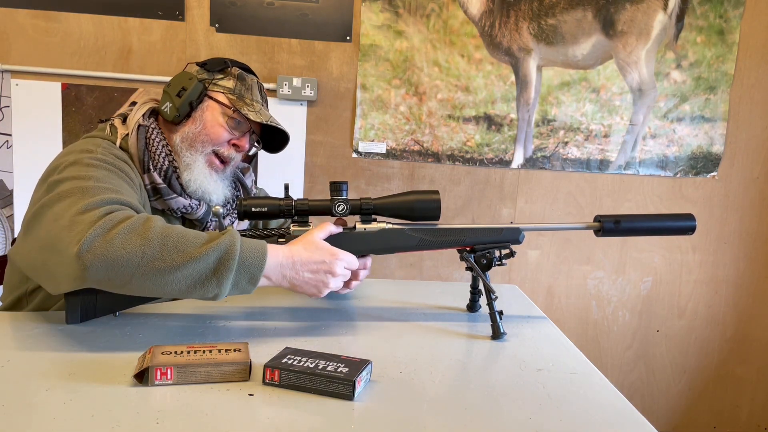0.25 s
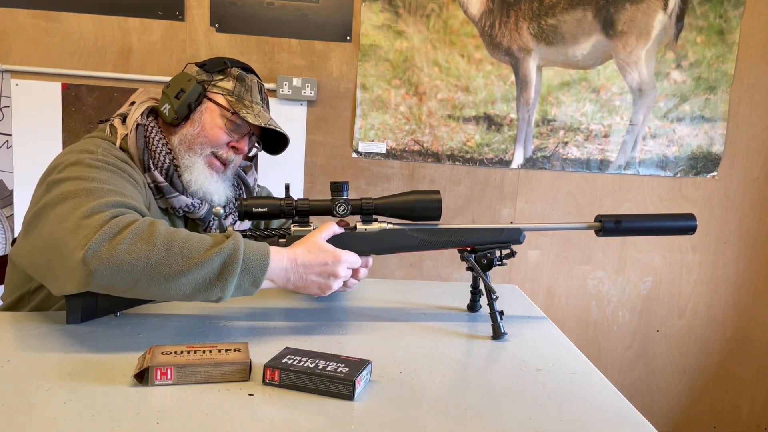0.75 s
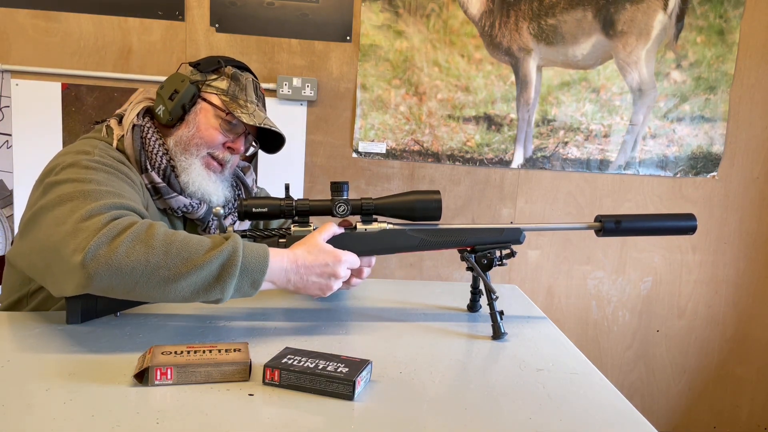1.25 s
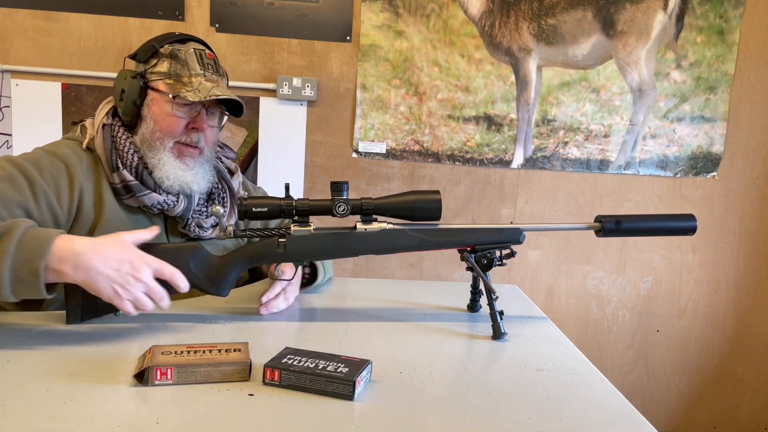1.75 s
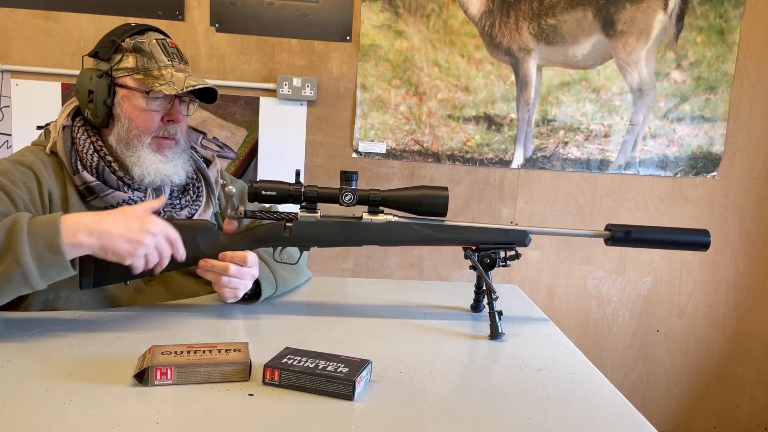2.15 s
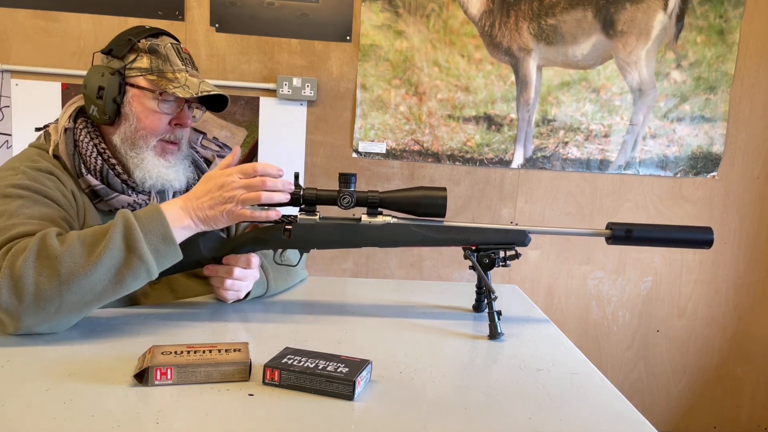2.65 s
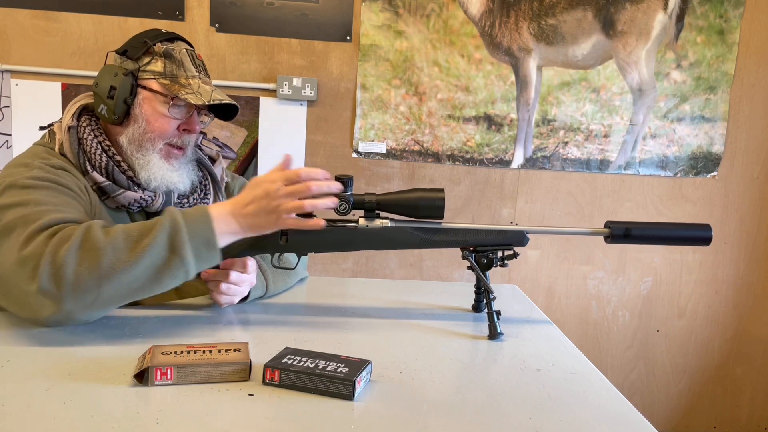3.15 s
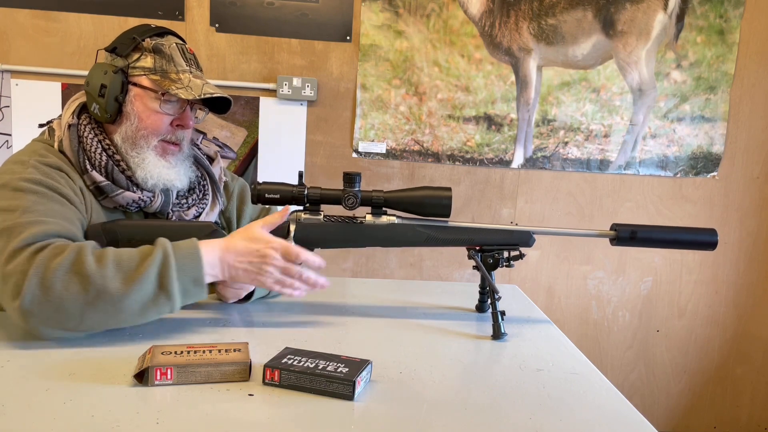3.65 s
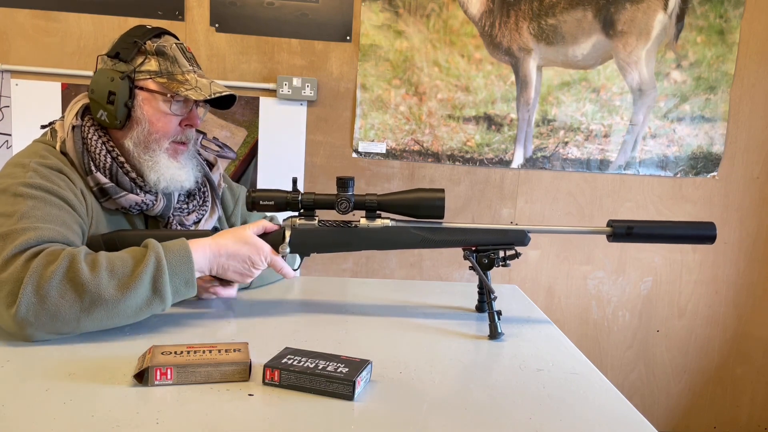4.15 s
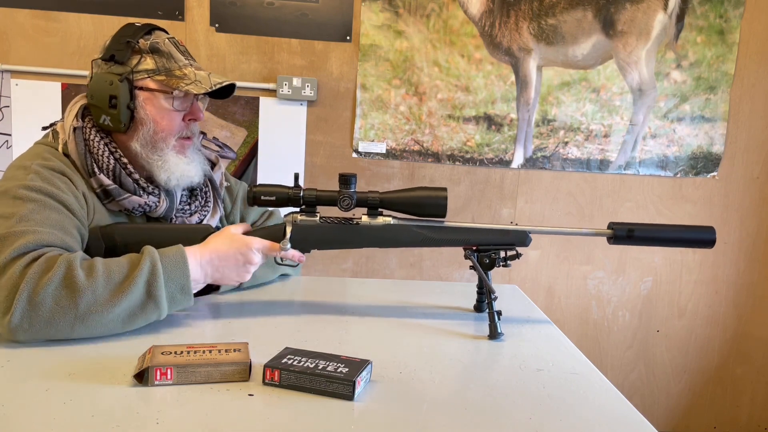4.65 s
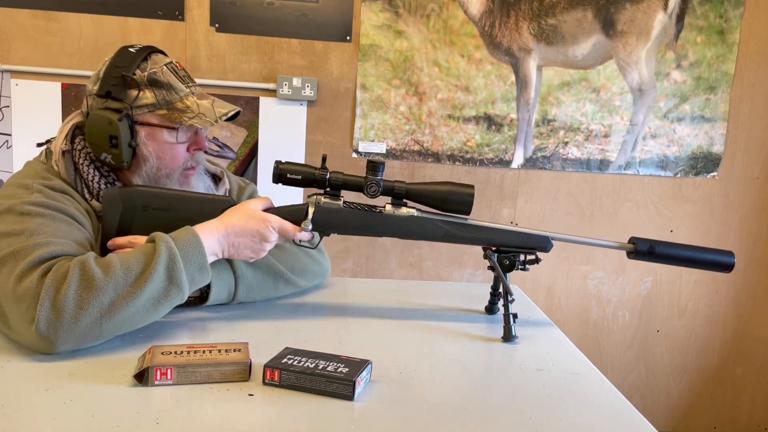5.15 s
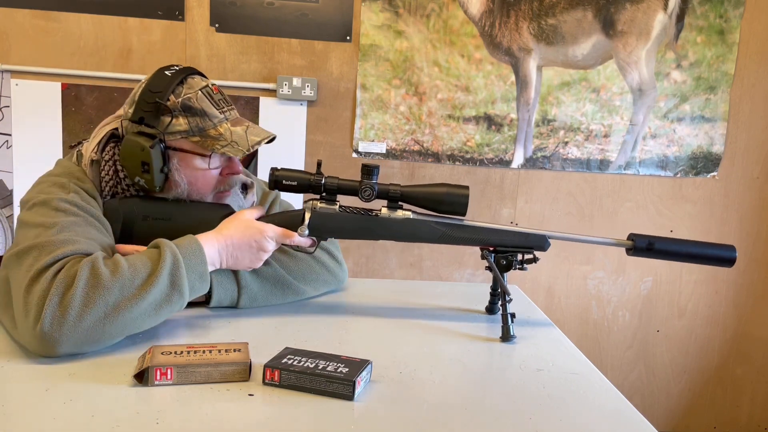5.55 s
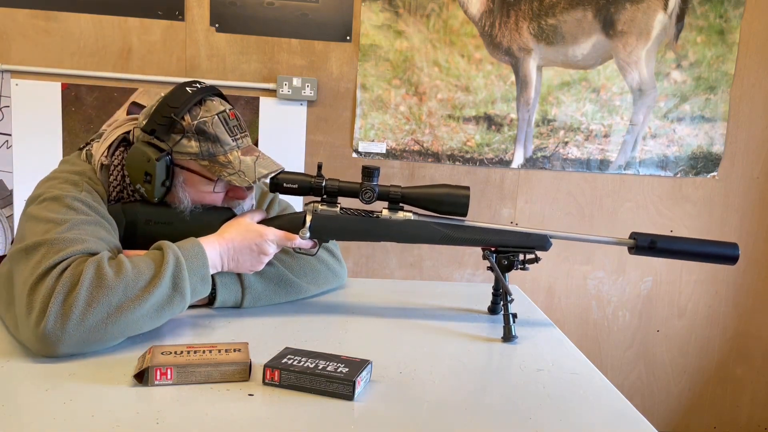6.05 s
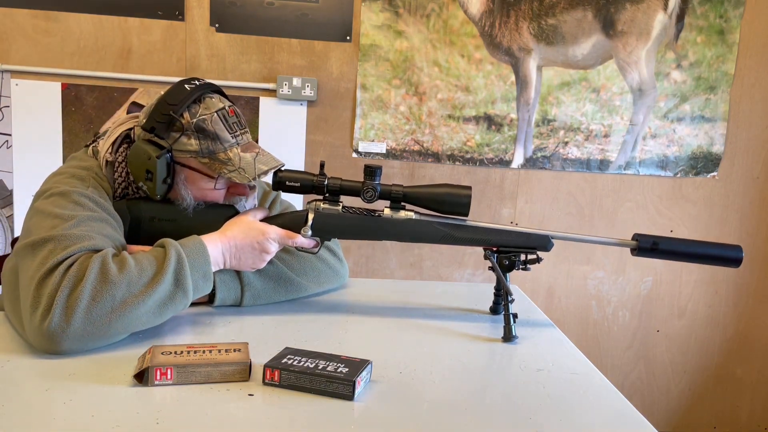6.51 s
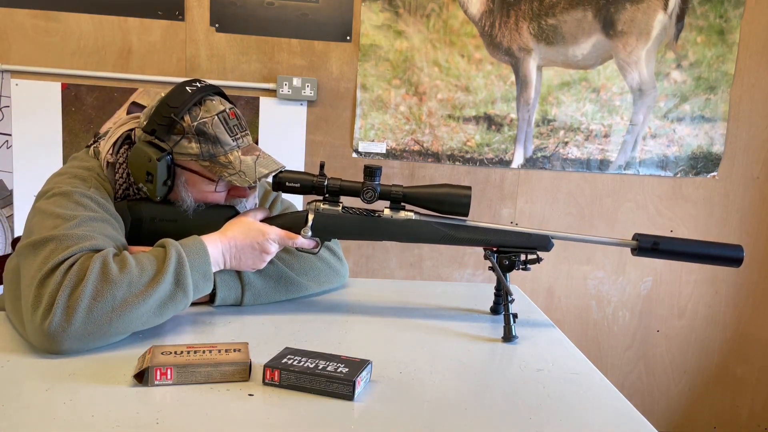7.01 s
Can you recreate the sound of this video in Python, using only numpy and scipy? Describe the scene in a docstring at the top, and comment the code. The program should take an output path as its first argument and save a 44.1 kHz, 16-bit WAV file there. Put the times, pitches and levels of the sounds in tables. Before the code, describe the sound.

A magazine snaps into a rifle in a small hard room, then the bolt clacks back and forward with loud steel rings, followed by soft knocks and bipod scuffs.

```python
"""Faint ventilation fills a small, hard-walled range, then the magazine of a bolt-action rifle snaps home.
Hands knock the stock on its bench; the bolt is lifted, drawn back, run forward and locked with steel clacks.
The bipod skids, its springs creak, the barrel hums and a sleeve rustles as the rifle is shouldered.
Blows are noise bursts and dying tones, rubbing is uneven noise, and echoes and a tail make the room.
The loudest clacks overload the microphone."""
import sys
import numpy as np
from scipy import signal
from scipy.fft import rfft, irfft, next_fast_len
from scipy.io import wavfile
from scipy.ndimage import uniform_filter1d, minimum_filter1d, map_coordinates

SR = 44100
rng = np.random.default_rng(int(sys.argv[2]) if len(sys.argv) > 2 else 0)


def store_wav(level_fs):
    """Save 16-bit WAV to argv[1]."""
    pcm = np.round(np.clip(np.atleast_2d(level_fs), -1, 1) * 32767)
    wavfile.write(sys.argv[1], SR, pcm.T.astype(np.int16))


N = 320871

# Tones of the ringing steel action. Each row: pitch in Hz, relative level in dB, time to die by 60 dB in seconds.
STEEL_MODES = [(1292, -4, .12), (2393, -2, .16), (2964, -3, .14), (4067, -6, .15), (4119, 2, .4),
               (4175, 1, .3), (4667, 0, .05), (4841, -1, .1), (4960, -3, .1), (5430, -1, .05),
               (6183, -6, .12), (6952, -6, .12), (9066, -3, .07), (9177, -5, .07)]
# Colour of the bright edge of a blow. Each row: frequency in Hz, relative spectrum level in dB.
EDGE_COLOUR = [(4000, -30), (7300, -5.5), (9000, 1), (10000, -9.5), (12000, -24)]
# Colour of the highest fizz of a blow. Each row: frequency in Hz, relative spectrum level in dB.
FIZZ_COLOUR = [(8000, -45.5), (10500, -3.5), (13000, 2.5), (16000, -10), (20000, -25)]


def amp(db):
    """Turn decibels into a gain."""
    return 10 ** (np.asarray(db) / 20)


def unit(x):
    """Scale to an average (rms) level of 1."""
    return x / np.sqrt(np.mean(x ** 2) + 1e-20)


def clock(size):
    """Give the time in seconds of each sample."""
    return np.arange(size) / SR


def along(points, hz):
    """Read values between (Hz, value) points, with frequency on a log axis."""
    point_hz, values = np.transpose(points)
    return np.interp(np.log(hz + 1), np.log(point_hz + 1), values)


def curves(rows):
    """Draw each column after the time as a line with one value per sample."""
    seconds, *columns = np.transpose(rows)
    return [np.interp(clock(N), seconds, column) for column in columns]


def coloured(x, spectrum):
    """Make some frequencies of x louder than others, as the spectrum says, at rms 1."""
    m = next_fast_len(len(x))
    gain = amp(along(spectrum, np.fft.rfftfreq(m, 1 / SR)))
    return unit(irfft(rfft(x, m) * gain, m)[:len(x)])


def fade(t60, size):
    """Die away by 60 dB in t60 seconds."""
    return np.exp(-np.log(1000) * clock(size) / max(t60, 1e-3))


def burst(spectrum, t60, size=16384):
    """A blow into many close, damped modes: a dying, evenly spread rattle with a colour."""
    rattle = rng.standard_normal(size) * fade(t60, size)
    # keep only the phases, so that no one mode stands out
    even = irfft(np.exp(1j * np.angle(rfft(rattle)))) * fade(5 * t60, size)
    even *= np.linalg.norm(fade(t60, size)) / np.linalg.norm(even)
    gain = amp(along(spectrum, np.fft.rfftfreq(size, 1 / SR)))
    # fold the log spectrum onto positive time: the colour cannot sound before the blow
    causal = irfft(np.log(unit(gain) + 1e-6)) * (1 + np.sign(np.fft.fftfreq(size)))
    return irfft(np.exp(rfft(causal)) * rfft(even))


def ring(modes, size=SR):
    """Clear tones struck together, each dying at its own pace, with alternating signs."""
    total = np.zeros(size)
    for k, (hz, db, t60) in enumerate(modes):
        tone = np.sin(2 * np.pi * hz * clock(size))
        total += amp(db) * fade(t60, size) * tone * (-1) ** k
    return total


def add(track, s, sound):
    """Mix a sound into the track at s seconds."""
    part = track[round(s * SR):][:len(sound)]
    part += sound[:len(part)]


def wobble(rate):
    """A smooth random curve through rate random points a second."""
    return map_coordinates(rng.standard_normal(N // 8), [clock(N) * rate], mode="wrap")


def friction(spectrum, rate, grip_db):
    """Rubbing surfaces: coloured noise whose strength wanders at rate points a second."""
    return coloured(rng.standard_normal(N) * amp(grip_db * wobble(rate)), spectrum)


def strokes(rows, release):
    """Gain of movements: each swells by 60 dB in its rise time, holds, and dies by 60 dB in release seconds."""
    t, gain = clock(N), np.zeros(N)
    for s, held, rise, db in rows:
        before = np.maximum(s - t, 0) / max(rise, 1e-3)
        after = np.maximum(t - s - held, 0) / release
        gain = np.maximum(gain, amp(db) * np.exp(-np.log(1000) * (before + after)))
    return gain


def ventilation():
    """Steady air noise, and a fan motor's hum that wanders slightly in level and phase."""
    # Colour of the air noise. Each row: frequency in Hz, relative spectrum level in dB.
    air_colour = [(12, -41.5), (20, -9), (65, -8), (98, -5.5), (204, -13), (228, -13.5), (301, -17.5),
                  (377, -19), (607, -20.5), (738, -20), (1060, -15.5), (2910, -28), (4060, -36.5),
                  (12100, -38), (16000, -46.5)]
    # Fan motor tones. Each row: pitch in Hz, middle level in dB.
    hum_tones = [(100, -59.5), (300, -72)]
    air_db = -53.5
    out = amp(air_db) * coloured(rng.standard_normal(N), air_colour)
    for hz, db in hum_tones:
        out += amp(db + 2 * wobble(4)) * np.sin(2 * np.pi * hz * clock(N) + wobble(12))
    return out


def sleeve():
    """Fleece rubs on itself as the arm moves, heard as soft uneven noise."""
    # Arm movements. Each row: full speed in seconds, time held in seconds, rise in seconds, level in dB.
    arm_moves = [(1.4, 0.016, 0.32, -55.5), (1.95, 0.22, 1, -52), (4.08, 0.39, 2.8, -55.5),
                 (5.04, 0.18, 1.5, -56), (5.4, 0.66, 0.91, -65)]
    # Colour of the cloth. Each row: frequency in Hz, relative spectrum level in dB.
    cloth_colour = [(1180, -29.5), (2000, -1), (2380, -6), (6940, -3), (9010, -3.5), (10400, -12),
                    (13800, -6.5), (16000, -19)]
    return strokes(arm_moves, release=1.2) * friction(cloth_colour, rate=110, grip_db=1.5)


def barrel():
    """The free barrel swells into a hum after each blow, then its tones die away."""
    # Blows. Each row: start in seconds, level in dB, swell in seconds, level of the upper tones in dB.
    barrel_blows = [(2.349, -33.5, 1, -12), (3.189, -43.5, 0.048, -5.5), (3.385, -36, 0.0403, 3.5),
                    (4.845, -26, 0.053, -1)]
    # Barrel tones. Each row: pitch in Hz, relative level in dB, time to die by 60 dB in seconds.
    barrel_modes = [(228.4, 5, 0.72), (483, -11, 0.91), (756, -17.5, 0.98), (970, -11, 0.84),
                    (1035, -12, 0.74), (1800, -24, .35), (2040, -19, .35), (2350, -16.5, .36)]
    out = np.zeros(N)
    for s, db, swell, upper_db in barrel_blows:
        hum = ring(barrel_modes[:1]) + amp(upper_db) * ring(barrel_modes[1:])
        add(out, s, amp(db) * hum * (1 - fade(swell, SR)))
    return out


def springs():
    """The bipod's coils slip at an uneven rate under load; each slip is a very high tick."""
    # Creaks. Each row: full load in seconds, time held in seconds, rise in seconds, relative level in dB.
    creaks = [(3.43, 0.017, 0.022, -23), (4.72, 0.069, 0.025, -51), (4.79, 0.05, 0.13, -34)]
    # Coil tones. Each row: pitch in Hz, relative level in dB, time to die by 60 dB in seconds.
    coil_modes = [(3210, -13.5, 0.065), (6250, -17.5, 0.041), (9400, -12, 0.023), (11600, -2, 0.011),
                  (12500, -7, .004), (13700, -2.5, .004)]
    turns = np.cumsum(170 * np.exp(0.36 * wobble(110))) / SR  # about 170 slips a second
    # one click at each whole turn, each with its own strength
    slips = np.diff(np.floor(turns), prepend=0) * amp(2.8 * wobble(200))
    ticks = unit(signal.fftconvolve(slips, ring(coil_modes))[:N])
    return amp(0.5) * strokes(creaks, release=0.033) * ticks


def bipod():
    """The feet skid on the bench as rough noise; the legs grind and jolt in their hinges."""
    # Skids of the feet. Each row: full speed in seconds, time held in seconds, rise in seconds, level in dB.
    skids = [(4.785, 0.03, 0.077, -28), (5.805, 0.007, 0.3, -44.5)]
    # Hinge grinding before a jolt. Each row: full speed in seconds, time held in seconds, rise in seconds,
    # level in dB.
    grinds = [(6.035, 0.03, 0.17, -36)]
    # Jolts of the legs. Each row: start in seconds, relative level in dB, time to die by 60 dB in seconds.
    jolts = [(5.498, -13, 0.039), (5.506, -5.5, 0.06), (5.792, -19.5, 0.06), (5.859, -26, 0.056),
             (6.044, -29, 0.26), (6.059, -13, 0.063)]
    # Colours of feet, hinges and legs. Each row: frequency in Hz, relative spectrum level in dB.
    feet_colour = [(59, -23), (100, -4), (234, 1), (381, -3.5), (535, 0), (818, -14.5), (1080, 2),
                   (1200, -21), (1950, -10), (2080, -9), (2630, -15.5), (5900, -19.5), (7450, -23.5),
                   (12100, -20.5), (16000, -33.5)]
    hinge_colour = [(180, -43), (300, -4.5), (593, -11), (745, -1.5), (1140, -14), (1580, -5), (1970, -11),
                    (2840, -15), (3350, -9), (5700, -24), (6740, -33), (8360, -28), (16000, -49)]
    legs_colour = [(300, -19), (550, -13), (800, -10), (1150, 0.5), (1600, -4.5), (2250, 1), (3150, -1.5),
                   (4200, -10.5), (6000, -4), (8000, -11), (12000, -15.5), (16000, -20)]
    out = strokes(skids, release=0.087) * friction(feet_colour, rate=300, grip_db=0.0)
    out += strokes(grinds, release=0.23) * friction(hinge_colour, rate=300, grip_db=6.5)
    for s, db, t60 in jolts:
        add(out, s, amp(db - 11.5) * burst(legs_colour, t60))
    return out


def stock():
    """Hands knock and rub the hollow stock, with the bench booming under it."""
    # Stock and elbows shifting on the bench. Each row: full speed in seconds, time held in seconds,
    # rise in seconds, rub level in dB, relative boom level in dB.
    shifts = [(1.289, 0.063, 0.023, -42, -46), (4.76, 0.044, 0.45, -43, -37), (4.92, 0.11, 0.1, -46, -61),
              (5.39, 0.1, 0.25, -44.5, -50), (5.575, 0.16, 0.11, -43.5, -33.5),
              (5.975, 0.05, 0.07, -57, -43)]
    # Dull knocks of hand and stock. Each row: start in seconds, relative level in dB.
    thumps = [(1.276, -22.5), (1.284, -22), (1.329, -43), (1.913, -32), (2.083, -23), (2.091, -19),
              (2.299, -28), (2.721, -25), (2.807, -27.5), (5.314, -19), (5.464, -31.5), (5.657, -14)]
    # Tones of the hollow stock. Each row: pitch in Hz, relative level in dB, time to die by 60 dB in seconds.
    butt_modes = [(331.4, -5, 0.028), (438.6, 0, 0.023), (544.5, -6, 0.019), (890, -3.5, 0.012)]
    # Colours of the stock and of the bench. Each row: frequency in Hz, relative spectrum level in dB.
    stock_colour = [(120, -28), (260, -3), (420, -5), (600, -8), (950, -14), (1400, -16.5), (2200, -20),
                    (5000, -34), (12000, -53)]
    boom_colour = [(60, -30.5), (120, -8), (155, -3), (188, 6.5), (220, -7), (300, -22), (500, -41.5)]
    bench_db, bench_grows = -28, 0.62  # bench under a 0 dB knock; dB of boom per dB of knock

    rub = strokes([(s, held, rise, db) for s, held, rise, db, _ in shifts], release=0.63)
    boom = strokes([(s, held, rise, db) for s, held, rise, _, db in shifts], release=0.071)
    out = rub * friction(stock_colour, rate=90, grip_db=3)
    out += amp(-7.0) * boom * friction(boom_colour, rate=40, grip_db=-1.5)
    for s, db in thumps:
        knock = amp(-9.5) * ring(butt_modes, size=16384) + amp(-5) * burst(stock_colour, t60=0.026)
        bench = amp(bench_db + bench_grows * db) * burst(boom_colour, t60=0.052)
        add(out, s, amp(db) * knock + bench)
    return out


def raceway():
    """The bolt squeaks on its cam, then scrapes back and forward; the scraping rings the receiver."""
    # Squeak of the bolt cam. Each row: time in seconds, middle pitch in Hz, level in dB.
    squeak_path = [(2.53, 4460, -81), (2.57, 4410, -51), (2.62, 4090, -55.5), (2.69, 4220, -63.5),
                   (2.72, 4000, -81.5)]
    # Bolt strokes back, forward and home. Each row: full speed in seconds, time held in seconds,
    # rise in seconds, relative level in dB.
    slides = [(3.095, 0.081, 0.14, -17.5), (3.26, 0.13, 0.11, -27), (3.42, 0.023, 0.12, -18)]
    # Colour of the scrape. Each row: frequency in Hz, relative spectrum level in dB.
    raceway_colour = [(120, -47.5), (200, -9), (558, -23.5), (806, -13.5), (933, -21.5), (1300, -6.5),
                      (1740, -15.5), (3130, -6), (3620, -14.5), (4120, -14.5), (6520, -13.5), (9060, -20),
                      (16000, -36.5)]
    hz, squeak_db = curves(squeak_path)
    shaky_hz = hz * (1 + .02 * wobble(300))
    squeak = amp(squeak_db) * np.sin(2 * np.pi * np.cumsum(shaky_hz) / SR)
    scrape = friction(raceway_colour, rate=350, grip_db=5)
    singing = unit(signal.fftconvolve(scrape, ring(STEEL_MODES))[:N])
    return squeak + strokes(slides, release=0.22) * (amp(-3) * scrape + amp(-17) * singing)


def magazine():
    """The plastic magazine ticks along its well and the catch snaps over: short rattles with a ring."""
    # Ticks and snaps. Each row: start in seconds, level in dB, then relative levels in dB of the bright edge
    # and of the hollow well.
    snaps = [(0.304, -23, -27.5, -9), (0.363, -19, -46, -0.5), (0.373, -31.5, -29, 8),
             (0.384, -11.5, -25, -12.5), (0.522, 5, -26.5, -24.5)]
    # Tones of the shell. Each row: pitch in Hz, relative level in dB, time to die by 60 dB in seconds.
    shell_modes = [(1063, -10.5, 0.017), (2170, -13, 0.043), (2600, -8, 0.014), (1830, -11, 0.013),
                   (2754, -8, 0.018), (3200, -11.5, 0.013), (3900, -12, 0.016), (4950, -10, 0.0074),
                   (6310, -21, 0.015), (7860, -28.5, 0.008)]
    # Colours of the plastic and of the hollow well. Each row: frequency in Hz, relative spectrum level in dB.
    plastic_colour = [(500, -38.5), (900, -12.5), (1100, -7), (1500, -14), (1950, -5.5), (2750, 8.5),
                      (4000, -1.5), (5250, -2.5), (7000, -7), (10000, -15.5), (16000, -27)]
    well_colour = [(800, -67.5), (1080, -6), (1270, 12), (1480, -0.5), (1900, -2.5), (4000, -37)]
    out = np.zeros(N)
    for s, db, edge_db, hollow_db in snaps:
        rattle = amp(-9) * burst(plastic_colour, t60=0.012)
        hollow = amp(hollow_db - 4.0) * burst(well_colour, t60=0.013)
        bright = burst(EDGE_COLOUR, t60=0.0041) + amp(-6.0) * burst(FIZZ_COLOUR, t60=0.014)
        shell = amp(-7.5) * ring(shell_modes, size=len(bright))
        add(out, s, amp(db) * (rattle + hollow + amp(edge_db) * bright + shell))
    low_hz = 800  # so small a part radiates little bass
    return signal.sosfilt(signal.butter(2, low_hz, "high", fs=SR, output="sos"), out)


def action():
    """Each steel contact clatters, pings the part that was hit, knocks the receiver and leaves a thin ring."""
    # Steel-on-steel contacts of bolt, action and bipod. Each row: start in seconds, level in dB,
    # relative knock level in dB, relative edge level in dB, pitch of the struck part in Hz.
    contacts = [ (0.9168, -38, -26, -2.5, 8460), (2.016, -18.5, -17, -23.5, 4410),
                (2.1249, -16.5, -23, -15.5, 5140), (2.2711, -12, -32.5, -9, 5560),
                (2.2863, -17, -17, -15.5, 2290), (2.2982, -16, -16.5, -16.5, 5500),
                (2.7045, -32.5, -25, -8, 8400), (2.7112, -18.5, -32, -14.5, 3110),
                (2.7174, -16, -23.5, -26, 4290), (2.798, -20.5, -20, -29, 2410),
                (2.8073, -23, -20.5, -21, 1880), (3.048, -21, -14, -21, 4400),
                (3.0817, -10, -19, -20.5, 3170), (3.1111, -8, -29, -17, 2620),
                (3.1222, 5, -29.5, -20.5, 3250), (3.1311, 6, -31, -7.5, 4610),
                (3.1405, 5.5, -20, -14.5, 2360), (3.1758, 6, -20.5, -6.5, 9000),
                (3.186, 9.5, -19.5, -14.5, 4140), (3.1961, 0, -22.5, -13.5, 6900),
                (3.3158, -3.5, -20, -7.5, 9340), (3.3581, -6.5, -16.5, -16.5, 3860),
                (3.381, 8.5, -9, -12, 1320), (3.3842, 3.5, -12, -16.5, 2710),
                (3.3924, -6.5, -7, -13.5, 1360), (3.7274, -29, -9, -19, 1720),
                (4.2198, -18.5, -26, -10, 4900), (4.2633, -12, -19.5, -11.5, 4050),
                (4.7705, -28.5, -7, -15, 2390), (4.796, -16, -35, -21, 2970), (4.8224, -14, -11, -17, 2150),
                (5.1362, -34, -14, -8.5, 8150), (5.2122, -31.5, -17, -15, 3260)]
    # Tones of the struck part. Each row: ratio to its pitch, relative level in dB,
    # time to die by 60 dB in seconds.
    part_modes = [(1, 0, .015), (.62, -8, .011), (1.33, -9, .009)]
    # Colours of the clatter and of the knock. Each row: frequency in Hz, relative spectrum level in dB.
    clatter_colour = [(600, -41.5), (1200, -6.5), (1800, -5.5), (2600, -0.5), (3500, -3.5), (5000, -0.5),
                      (7000, -6), (9000, -12.5), (12000, -28.5)]
    knock_colour = [(60, -29), (200, -14.5), (450, -6.5), (680, 2), (900, 3.5), (1350, 3.5), (1750, -1.5),
                    (2300, -11.5), (5000, -50)]
    steel_db, steel_grows = -39.5, 0.31  # ring in a 0 dB contact; extra dB of ring per dB of contact

    out = np.zeros(N)
    for s, db, knock_db, edge_db, part_hz in contacts:
        clatter = amp(-10.0) * burst(clatter_colour, t60=0.039)
        knock = amp(knock_db) * burst(knock_colour, t60=0.032)
        bright = amp(3.5) * burst(EDGE_COLOUR, t60=0.013) + amp(-5.5) * burst(FIZZ_COLOUR, t60=0.037)
        crack = amp(edge_db) * bright
        part = [(part_hz * ratio, level, life) for ratio, level, life in part_modes]
        ping = amp(-7) * ring(part, size=len(knock))
        # each blow lands elsewhere, so the balance of the tones varies
        struck = [(hz, level + 2 * rng.standard_normal(), life) for hz, level, life in STEEL_MODES]
        thin_ring = amp(steel_db + steel_grows * db) * ring(struck, size=len(knock))
        add(out, s, amp(db) * (clatter + knock + crack + ping + thin_ring))
    return out


def reverb(x, size=16384):
    """The room's diffuse tail: dying noise, drawn afresh for each overlapping piece as if the shooter moves."""
    # How long the room rings. Each row: frequency in Hz, time to die by 60 dB in seconds.
    room_decay = [(120, 0.74), (400, 0.57), (1000, 0.69), (3000, 0.58), (6000, 0.63), (9000, 0.46),
                  (15000, 0.31)]
    out = np.zeros(N)
    for start in range(0, N - size, size // 2):
        hz, t, z = signal.stft(rng.standard_normal(SR), SR, nperseg=256)
        dying = np.exp(-np.log(1000) * t / along(room_decay, hz)[:, None])
        tail = signal.istft(z * dying, SR, nperseg=256)[1]
        tail *= 1 - fade(0.0099, len(tail))  # the tail builds up softly
        piece = x[start:start + size] * signal.get_window("hann", size)
        add(out, start / SR, signal.fftconvolve(piece, tail / np.linalg.norm(tail)))
    return out


def scene():
    """Mix all sources, the echoes of most of them off the near walls, and the room's tail."""
    # Early echoes. Each row: delay in seconds, gain as a plain factor.
    walls = [(.0073, 0.14), (0.012, 0.22), (0.0139, .12), (.019, .1)]
    snap, steel, knocks, legs = magazine(), action() + raceway(), stock(), bipod()
    direct = snap + steel + knocks + legs + springs() + sleeve()
    out = direct + barrel() + ventilation()
    for delay, gain in walls:
        add(out, delay, gain * direct)
    return out + reverb(amp(-5) * snap + amp(-4) * steel + amp(-1.0) * knocks + amp(2.0) * legs)


def record(dry):
    """A fast limiter ducks the loudest clacks, what is left flattens at full scale, and the top is cut."""
    top_hz = 16250  # nothing passes above this
    needed = 1 / np.maximum(1, np.abs(dry) / amp(6))
    # spread each dip over neighbouring samples, then smooth it
    ducked = dry * uniform_filter1d(minimum_filter1d(needed, size=67), size=67)
    clipped = ducked / (1 + np.abs(ducked) ** 8) ** (1 / 8)
    m = next_fast_len(N + 8192)
    passed = np.clip((top_hz - np.fft.rfftfreq(m, 1 / SR)) / 400, 0, 1) ** 2  # falls over the last 400 Hz
    return irfft(rfft(clipped, m) * passed, m)[None, :N]


dry = scene()
out = record(dry)
store_wav(out)
```